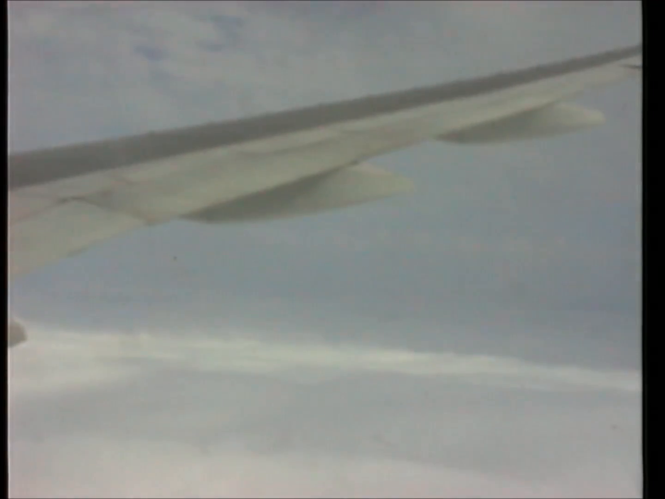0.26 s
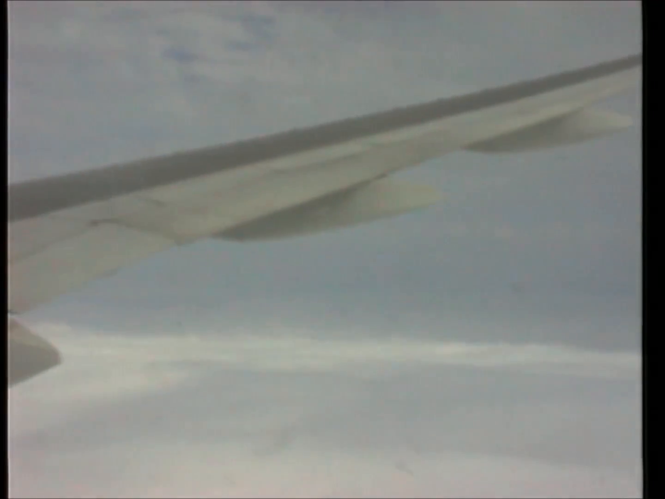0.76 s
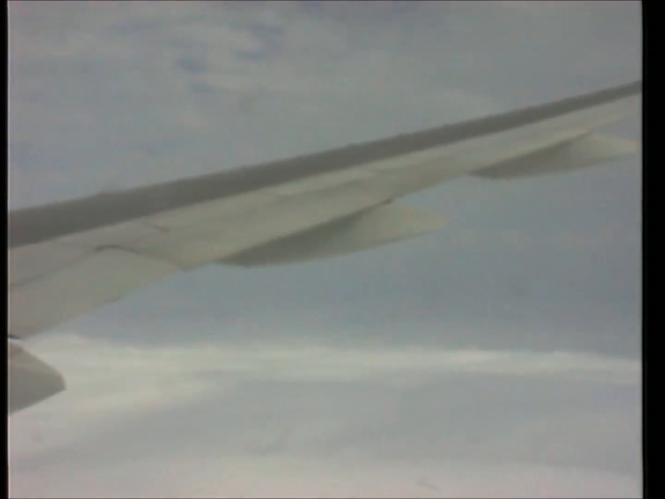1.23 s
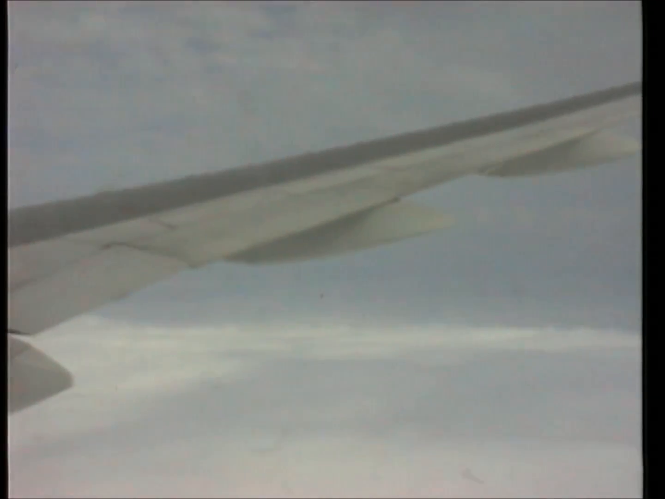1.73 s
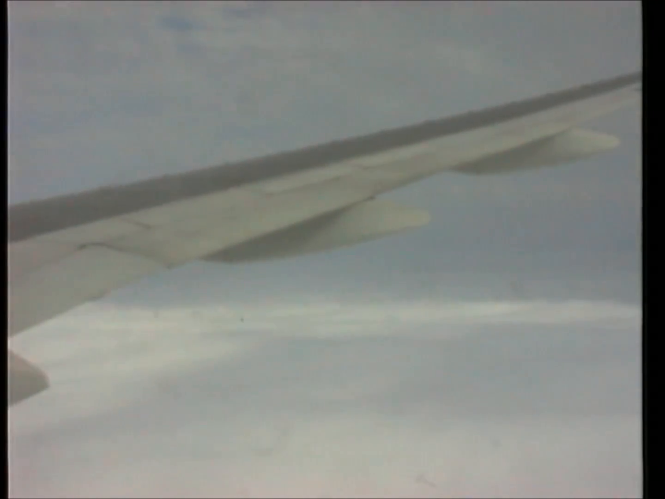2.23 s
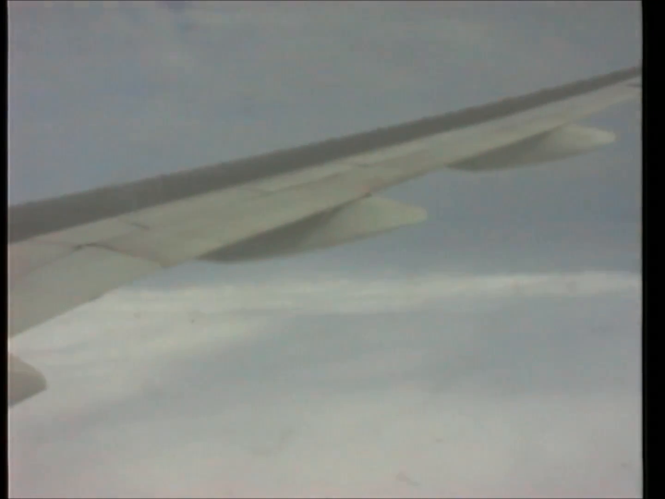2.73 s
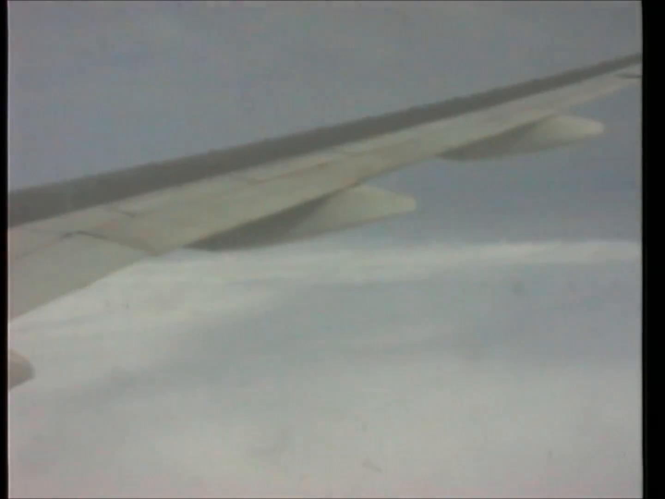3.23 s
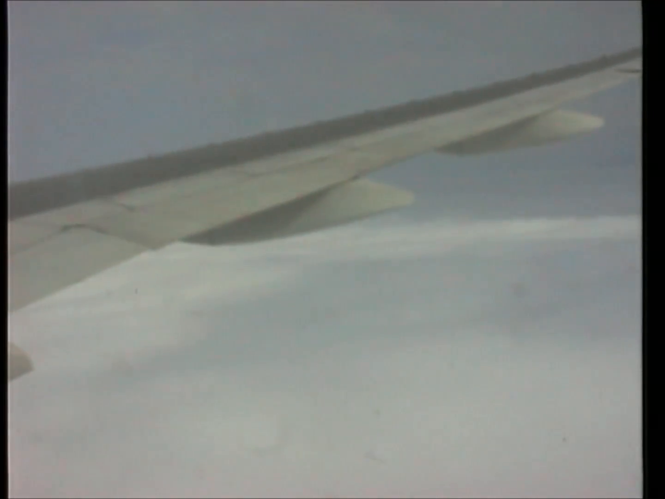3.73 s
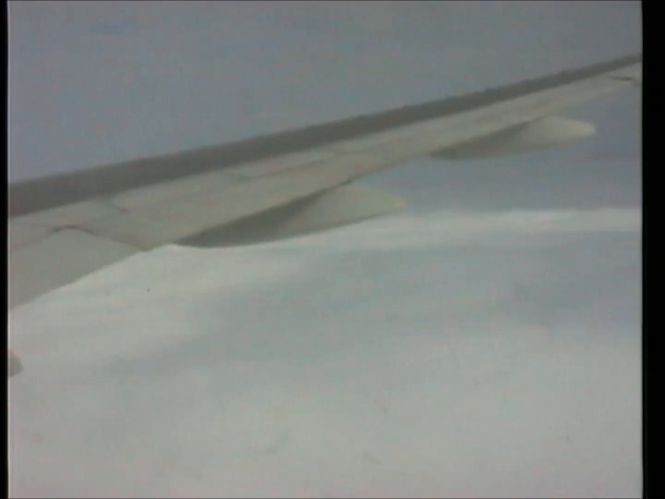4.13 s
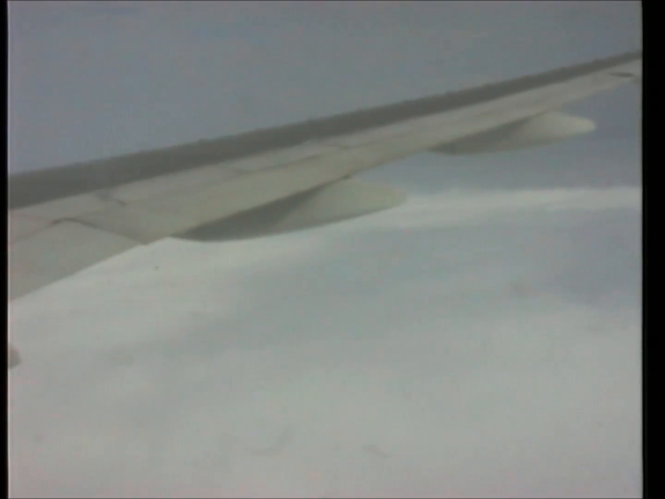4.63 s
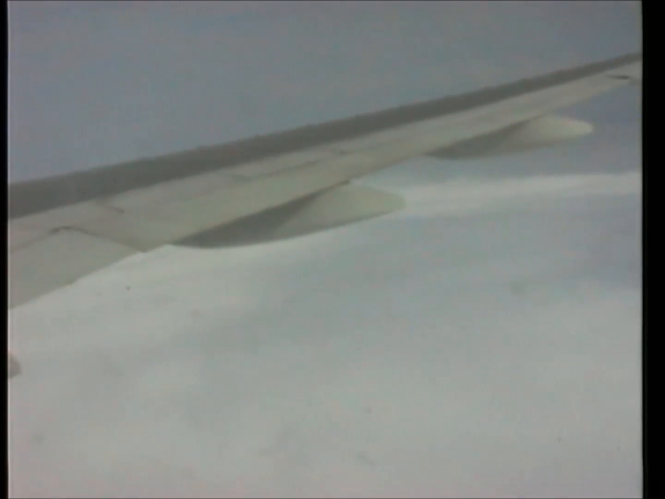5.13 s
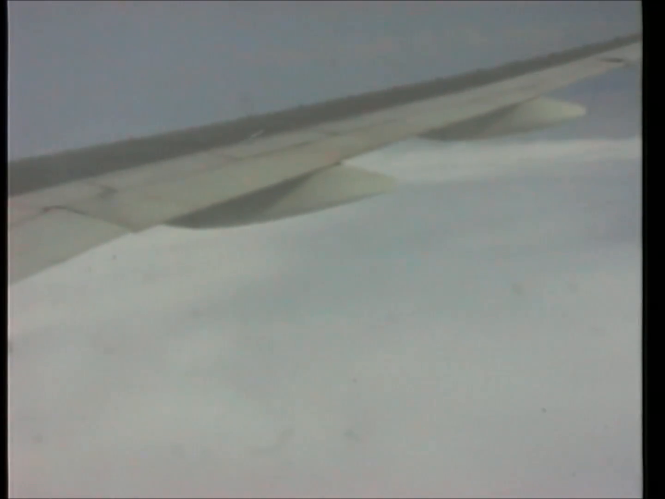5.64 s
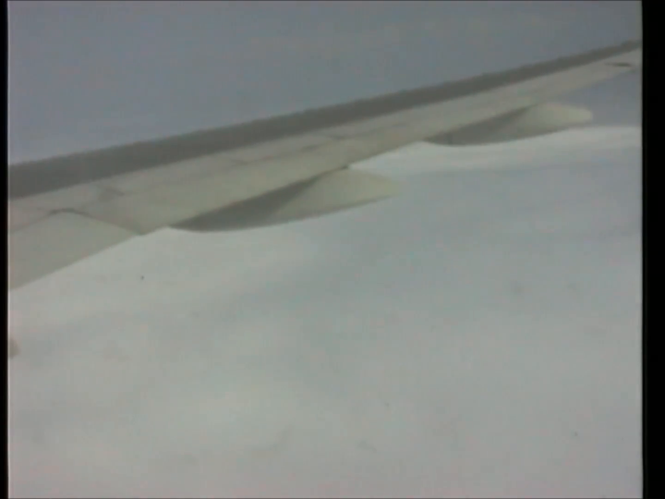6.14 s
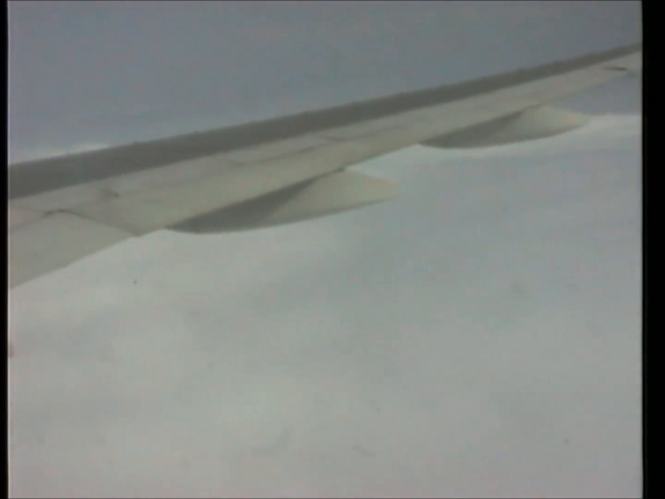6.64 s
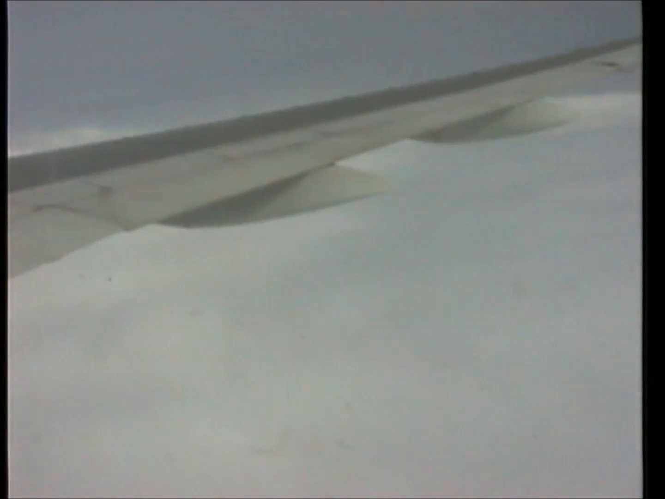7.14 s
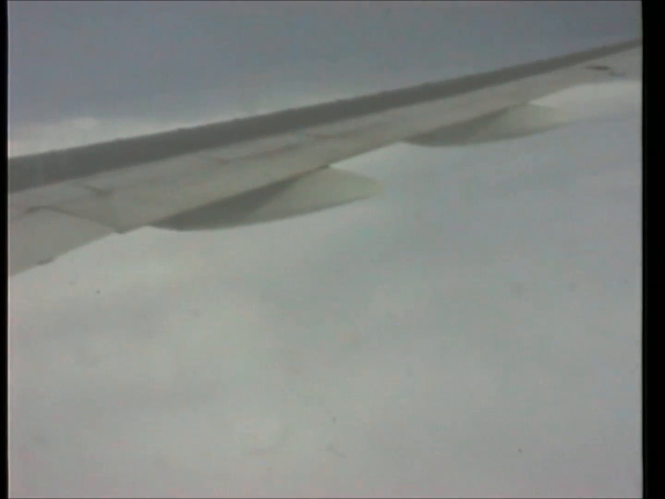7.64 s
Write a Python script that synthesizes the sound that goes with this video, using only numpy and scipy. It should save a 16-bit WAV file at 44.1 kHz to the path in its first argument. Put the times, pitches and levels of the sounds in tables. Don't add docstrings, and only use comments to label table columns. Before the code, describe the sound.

At a window seat in flight, low engine and airflow rumble holds constant while a hand-held tape camera whines, knocks, rubs and ticks.

```python
import sys
import numpy as np
from scipy import signal
from scipy.fft import rfft, irfft, next_fast_len
from scipy.io import wavfile
from scipy.ndimage import uniform_filter1d, map_coordinates

SR = 44100
rng = np.random.default_rng(int(sys.argv[2]) if len(sys.argv) > 2 else 0)


def undo_db(level):
    steps = np.asarray(level, float) / 20
    return 10 ** steps


def digitize_waveform(pressure):
    field = np.atleast_2d(pressure).T
    bounded = np.clip(field, -1, 1)
    quanta = np.round(bounded * 32767).astype(np.int16)
    wavfile.write(sys.argv[1], SR, quanta)


N = 347495


def unit(x):
    return x / np.sqrt(np.mean(x ** 2) + 1e-20)


def along(points, hz):
    f, v = np.transpose(points)
    return np.interp(np.log(hz + 1), np.log(f + 1), v)


def wobble(rate):
    steps = np.arange(0, N + 128, 128)
    knots = rng.standard_normal(int(N * rate / SR) + 4)
    return np.interp(np.arange(N), steps, map_coordinates(knots, [steps * rate / SR]))


def filtered(x, response):
    m = next_fast_len(N + SR // 2)
    return irfft(rfft(x, m) * response(np.fft.rfftfreq(m, 1 / SR)), m)[..., :N]


def resonance(f, hz, width):
    return 1j * f * width / (hz * hz - f * f + 1j * f * width)


def sides(db):
    return undo_db(np.array([db, -db]) / 2)


def levels(left_db, right_db):
    return undo_db([[left_db], [right_db]])


def place(track, start, sound):
    track[:, round(start * SR):][:, :sound.shape[1]] += sound


# frequency in Hz, phase lead in radians.
LEAD = [(60, .9), (130, .9), (200, .45), (255, -.3), (320, .2), (470, .6), (700, .2), (780, 2.5), (950, .2),
        (1600, .6), (2050, 2.6), (2900, .2), (4500, .3), (6000, 2.3)]


def right_lag(hz):
    return along(LEAD, hz)


# time in seconds, pitch in Hz.
FAN_PITCH = [
    (0, 1384),
    (1.5, 1387),
    (3, 1395),
    (4.5, 1405),
    (6, 1399),
    (7.88, 1402),
]


def fan():
    hz = np.interp(np.arange(N) / SR, *np.transpose(FAN_PITCH))
    turn = 2 * np.pi * np.cumsum(hz) / SR - [[0], [right_lag(FAN_PITCH[0][1])]]
    a, b = wobble(20), wobble(20)
    return undo_db(-54.5) * sides(-1.0)[:, None] * ((.5 + a) * np.sin(turn) + b * np.cos(turn))


def tone(hz, drift, unsteady_db, lead=None):
    turn = 2 * np.pi * (hz * np.arange(N) / SR + rng.uniform()) + drift
    late = right_lag(hz) if lead is None else lead
    return np.sqrt(2) * undo_db(unsteady_db * wobble(2.7)) * np.sin(turn - [[0], [late]])


# frequency in Hz, left level in dB, right level in dB.
HUMS = [(721.4, -57, -56), (1666, -73, -71), (1948, -71, -76), (2127.7, -70, -66.5), (15674.8, -101, -101),
        (15734.7, -95, -90), (15746.8, -97, -92)]
# frequency in Hz, left level in dB, right level in dB.
FAINT = [(3273, -72, -74), (3777, -70, -76), (3872, -68, -80), (3824.8, -71, -80), (4328.5, -72, -70),
         (4942, -80, -80), (6705, -84, -82), (7397, -93, -83), (7964, -83, -86), (8153, -88, -81),
         (8263, -95, -82), (8466, -94, -82), (9160, -96, -87), (9475, -95, -87), (9978, -101, -88),
         (10670, -92, -90), (15285, -104, -107)]


def hums(flutter):
    lines = HUMS + FAINT
    return undo_db(0.3) * sum(levels(l, r) * tone(hz, flutter, unsteady_db=1.5, lead=.7) for hz, l, r in lines)


GEAR_HZ, DRUM_HZ = 503.66, 149.85
# order, left level in dB, right level in dB.
DRUM = [(42, -85, -80), (46, -81, -84), (50, -86, -83), (52, -85, -76), (53, -70, -78), (54, -80, -74),
        (55, -83, -69), (56, -76, -76), (57, -84, -89), (58, -99, -87), (61, -92, -89), (62, -89, -99),
        (67, -92, -91), (68, -89, -93), (70, -90, -89), (72, -93, -94), (84, -91, -89), (90, -102, -99),
        (92, -99, -102), (96, -92.5, -96), (98, -94, -98), (100, -97, -100)]


def head_drum():
    drift = .004 * wobble(3)
    lines = (levels(l, r) * tone(k * DRUM_HZ, k * drift, unsteady_db=-0.5, lead=.3) for k, l, r in DRUM)
    return undo_db(-1.5) * sum(lines)


SLOW = 94.5
NEAR, FAST = DRUM_HZ - SLOW, 2 * DRUM_HZ - SLOW
# mesh rate in Hz,
# tooth start in cycles, angle on the slow shaft in turns, level in dB at the 8th order, slope in dB per order.
WHEELS = [(503.5186, .2172, .15, -.1, -.63), (503.5875, .482, .45, -9, -2),
          (503.6168, .726, .32, 1.3, -.39), (503.6876, 0, 0, 0, 0), (503.772, .033, -.37, -9.5, -2),
          (504.0107, .7535, -.18, -5.2, 0)]
PROFILE = {6: [-1.5, -2.5, 1, 0, -2.5, -5], 7: [1.5, -2, 1.5, 0, -5, -5.5], 8: [0, -11.5, 1.5, 0, -11, -4],
           9: [-6, -7, 0, 0, -8, -6.5], 13: [-5.5, -6, -1, 0, -11, -4.5]}
SKEW = {5: [0, .2, 0, -.07, .05, .1], 6: [-.07, 0, 0, -.02, -.07, -.04], 7: [-.03, -.03, 0, -.08, -.03,
        .01], 8: [.02, -.02, 0, .03, 0, 0], 9: [-.2, .18, 0, -.12, -.06, -.03], 13: [0, 0, 0, -.11, .09,
        -.03]}


def beat(order, shaft):
    t = np.arange(0, N + 128, 128) / SR
    side = np.sign(shaft) * (1 if abs(shaft) == SLOW else -1)
    sloped = [db + slope_db * (order - 8) for *_, db, slope_db in WHEELS]
    wheel_db = PROFILE.get(order, sloped)
    leans = SKEW.get(order, np.zeros(len(WHEELS)))
    z = 0
    for (hz, start, angle, *_), db, lean in zip(WHEELS, wheel_db, leans):
        turns = order * ((hz - GEAR_HZ) * t + start) + side * angle
        z = z + undo_db(db) * np.exp(2j * np.pi * (turns + lean))
    swell, phase = unit(np.abs(z)), np.unwrap(np.angle(z))
    return [np.interp(np.arange(N) / SR, t, v) for v in (swell, phase)]


def teeth(order, shaft, flutter, lead=None):
    swell, slip = beat(order, shaft)
    return swell * tone(order * GEAR_HZ + shaft, order * flutter + slip, unsteady_db=.3, lead=lead)


# order, left level in dB, right level in dB, left's lead in radians.
GEAR = [(6, -61.5, -70, -.4), (7, -71.5, -58.5, 1), (8, -55.5, -61, -.4), (9, -69, -71.5, .8),
        (10, -88, -83, .7), (12, -82, -80, -2.4), (13, -73.5, -68, 2.2), (14, -89, -95, -1.5)]
# order, shaft offset in Hz, left level in dB, right level in dB.
BANDS = [(5, SLOW, -66, -67), (6, SLOW, -68, -71), (7, SLOW, -68, -74), (8, SLOW, -70, -69),
         (9, SLOW, -76, -84), (12, SLOW, -75, -87), (13, SLOW, -75, -75), (14, SLOW, -78, -81),
         (15, SLOW, -81, -86), (17, SLOW, -90, -86), (5, -SLOW, -69, -72), (6, -SLOW, -75, -78),
         (7, -SLOW, -69, -72), (8, -SLOW, -78, -70), (9, -SLOW, -69, -68), (11, -SLOW, -83, -78),
         (12, -SLOW, -79, -78), (13, -SLOW, -88, -77), (14, -SLOW, -78, -85), (15, -SLOW, -91, -76),
         (5, FAST, -73, -75), (7, FAST, -72, -82), (8, FAST, -70, -72), (9, FAST, -78, -70),
         (7, -FAST, -68, -75), (8, -NEAR, -71, -77), (8, NEAR, -72, -73), (13, -NEAR, -84, -79),
         (13, NEAR, -83, -78)]


def gear_train(flutter):
    mesh = sum(levels(l, r) * teeth(k, 0, flutter, lead) for k, l, r, lead in GEAR)
    sidebands = sum(levels(l, r) * teeth(k, shaft, flutter) for k, shaft, l, r in BANDS)
    return undo_db(0.26) * mesh + undo_db(1.0) * sidebands


def whine():
    flutter = .012 * wobble(4)
    return gear_train(flutter) + head_drum() + hums(flutter)


# start in seconds, peak in dB, left minus right in dB, brightness in dB.
TICKS = [(1.316, -32.5, -4, -17), (1.3702, -32, -5, -21), (1.8226, -31, -2, -7), (2.4778, -37, -7, -6),
         (2.549, -51, -1, -1), (2.934, -40.5, -2, -4), (2.977, -36, -8, -15), (2.989, -31, 1, -17),
         (3.7466, -36, 0, -2), (4.269, -42, 3, -9), (4.407, -45, 1, -2), (4.923, -43, -4, -15),
         (5.3294, -46, -2, -5), (5.375, -44, -6, -15), (5.6605, -50, -6, -9), (6.232, -42, -2, -1),
         (6.559, -37, 2, -8), (7.0297, -54, 4, -1), (7.333, -52, -2, -2), (7.345, -38.5, -4, 12.5),
         (7.456, -50, -3, -3), (7.467, -44, -6, -8)]
# start in seconds, level in dB, length in seconds.
RUSTLES = [
    (0.045, -53.5, 0.04),
    (0.309, -56, 0.05),
    (0.505, -54, .045),
    (1.275, -57.5, 0.047),
    (2.52, -61, 0.048),
    (3, -54, .03),
    (3.04, -52.5, 0.021),
    (6.23, -58, 0.056),
    (7.336, -50, 0.051),
]
# frequency in Hz, level in dB.
TICK_COLOUR = [(1800, -19), (3200, 10.5), (4200, 13), (5500, 4), (9000, -2.5), (13000, -13.5), (15700, -24),
               (16000, -120)]


def ticks():
    out, t = np.zeros((2, N + SR)), np.arange(SR // 8) / SR
    for s, db, pan_db, bright_db in TICKS:
        fall = undo_db(-60 * t / 0.022) + undo_db(-15.5 - 60 * t / 0.08)
        noise = rng.standard_normal((2, len(t) + 2))
        bright = noise[:, 1:-1] - undo_db(bright_db) * np.diff(noise, 2)
        crackle = bright * fall * (1 - np.exp(-t / 0.00031))
        place(out, s, undo_db(db - 6.0) * sides(pan_db)[:, None] * crackle)
    for s, db, length in RUSTLES:
        grain_db = 5.3 * np.repeat(rng.standard_normal(len(t) // 64 + 1), 64)[:len(t)]
        grains = rng.standard_normal((2, len(t))) * undo_db(grain_db)
        place(out, s, undo_db(db) * grains * np.sin(np.pi * np.minimum(t / length, 1)))
    return filtered(out[:, :N], lambda f: undo_db(along(TICK_COLOUR, f)))


# start in seconds, peak,
# brightness, flap mode and lid mode in dB.
KNOCKS = [(0.345, -23.5, -1.5, 3.5, -0.5), (0.469, -26, 1.5, 3, 0.5), (0.526, -19.5, -6, -3.5, -0.5),
          (0.716, -24, -1.5, 0, 3), (0.753, -32, -1, -4, 7.5), (0.885, -19.5, -2.5, -3, 3.5),
          (0.934, -26, -10, -1.5, -11), (1.047, -29.5, 9, -1.5, 10.5), (1.371, -23, 3, 1, 7),
          (1.492, -28, 6, -9, 7), (2.48, -17.5, 5, -1.5, 6), (2.501, -24, 1, -6, 7.5),
          (2.738, -25.5, -4, -3.5, -2), (3.169, -24.5, -13, 1, 0), (3.454, -25, 3.5, -3, 5),
          (3.491, -24.5, 1.5, 0.5, 1.5), (3.852, -19, -2, -1, 0), (3.877, -20.5, -4, -6, -4),
          (4.097, -25.5, 0, 1.5, 3), (4.48, -21, -0.5, 0.5, 1.5), (4.806, -24, -7, -4, 2),
          (4.924, -21, 5.5, 1, 7), (5.374, -24, 3.5, -3.5, 4), (5.733, -36, -7, 2, 2),
          (6.109, -26, -7, 1.5, -3), (6.174, -26.5, 3, 1, -2), (6.259, -24, 4, -0.5, 4),
          (6.285, -25.5, 3.5, -6, 5.5), (6.562, -26, 0, -1, 0.5), (7.238, -24.5, -9, -2, -4.5),
          (0.799, -35, -6, 2, 2), (2.021, -31, 1, -5, -1), (4.732, -27, -4, -5, -0.5),
          (7.117, -35.5, 0, 0, -2),
          (.870, -25, 4.5, 0, 1), (.991, -31, 2, -1, -4), (1.107, -25, 4, -3, 0), (1.120, -26, 3.5, 1, 3),
           (1.134, -28, -3, -1, -1), (1.305, -26, -1, 0.5, -1), (2.751, -28.5, -6, -0.5, 4),
           (2.768, -25.5, -3, 2, 1), (2.782, -30, 4.5, -1.5, 0.5), (3.150, -27, -8, -1, 5),
           (3.317, -25.5, 2, -2, 1.5), (3.341, -22.5, -5, -1.5, -3), (3.357, -23.5, 0.5, -2, -2),
           (3.393, -27, 1, 1, 6), (3.724, -31.5, 6, -8.5, 1), (4.893, -26, -3, 2, 1),
           (4.905, -24, 1, -2, 4), (6.267, -27.5, 4, -2, 0.5), (6.360, -27, -1, 0, -2.5),
           (6.601, -27, -6, 1, 1)]
# frequency in Hz, width in Hz, level in dB.
BODY = [(470, 90, -6), (615, 42, 7), (825, 42, 2), (1180, 140, -7)]


def knock_force():
    force, t = np.zeros((len(BODY) + 1, N + SR)), np.arange(SR // 8) / SR
    rattle_s = 0.0035
    rattle_size = np.array(len(BODY) * [[0.045]] + [[0.11]])
    for s, db, bright_db, flap_db, lid_db in KNOCKS:
        rattle = rng.standard_normal(len(t)) * t / rattle_s * np.exp(1 - t / rattle_s)
        blow = rattle_size * rattle - (t == 0)
        place(force, s, undo_db(db + 32.0 + np.c_[[0, 0, flap_db, lid_db, bright_db - 4.5]]) * blow)
    return force


# start in seconds, level in dB, brightness in dB, length in seconds, flap mode in dB.
RUBS = [
    (.335, -29, -4, 0.027, 7),
    (0.511, -29, 0, 0.04, -1),
    (1.102, -27, -3, 0.042, 5),
    (2.742, -28.5, -3, 0.055, 4.5),
    (4.068, -35.5, -9, 0.05, -2),
    (6.266, -28, 0, 0.051, -6),
    (6.345, -27, -13, 0.04, 3),
]


def rub_force():
    force, t = np.zeros((len(BODY) + 1, N + SR)), np.arange(SR // 8) / SR
    for s, db, bright_db, length, flap_db in RUBS:
        swell = np.sin(np.pi * np.minimum(t / length, 1))
        slips = np.prod(rng.standard_normal((2, len(t))), 0) * swell
        locked = [swell * np.sin(2 * np.pi * hz * t) / swell.sum() for hz, *_ in BODY] + [0 * t]
        loose = slips / np.linalg.norm(slips) * np.c_[[.6, .6, .6, .8, 1]]
        drive = loose + 1.7 * np.array(locked)
        place(force, s, undo_db(db + 41.0 + np.c_[[0, 0, flap_db, 0, bright_db - 1.5]]) * drive)
    return force


# frequency in Hz, width in Hz, level in dB.
CASE = [(1620, 1250, -21), (2600, 130, -13.5), (3500, 380, -23.5), (5230, 3700, -31), (8000, 2400, -48.5)]
# frequency in Hz, left minus right in dB.
CASE_TILT = [(500, -17.5), (850, -11), (1200, -10.5), (2600, -10.5), (3500, -18.5), (8000, -4.5)]


def case_modes(rows, first=0):
    def response(f):
        fingertips = (1 + 1j * f / 7000) ** 2
        ring = sum((-1) ** (first + k) * undo_db(db) * resonance(f, hz, width)
                   for k, (hz, width, db) in enumerate(rows))
        return sides(along(CASE_TILT, f)) / fingertips * ring
    return response


def handling():
    force = (knock_force() + rub_force())[:, :N]
    low = sum(filtered(force[k], case_modes([mode], k)) for k, mode in enumerate(BODY))
    return low + filtered(force[-1], case_modes(CASE))


# frequency in Hz, likeness from 0 to 1.
ALIKE = [(40, .3), (80, .86), (180, .98), (250, .75), (340, .96), (500, .58), (620, .8), (750, .4),
         (850, .65), (1400, .9), (2050, .35), (2600, .45), (4000, .5), (5200, .15)]
# frequency in Hz, left minus right in dB.
TILT = [(40, -5), (100, -10), (170, -9), (238, -6), (325, -10.5), (430, -5), (560, -7.5), (620, 0.5),
        (700, -4), (840, -11), (920, -1), (1005, -3.5), (1300, -7), (2050, -1), (4800, -1.5)]


def rush(colour, patchy_db):
    z = signal.stft(rng.standard_normal((2, N)), nperseg=512)[2]
    patches = rng.standard_normal(z.shape[1:])
    field = uniform_filter1d(uniform_filter1d(patches, 6, 0), 14, 1)
    shared, own = signal.istft(z * undo_db(patchy_db * unit(field)), nperseg=512)[1][:, :N]

    def alike(hz):
        return np.clip(along(ALIKE, hz), 0, 1)

    right = filtered(shared, lambda hz: alike(hz) * np.exp(-1j * right_lag(hz)))
    right = right + filtered(own, lambda hz: np.sqrt(1 - alike(hz) ** 2))
    pair = filtered(np.array([shared, right]), lambda hz: colour(hz) * sides(along(TILT, hz)))
    return pair / np.sqrt(np.mean(pair.mean(0) ** 2))


# frequency in Hz, level in dB per Hz.
AIR = [(880, -27), (1500, -1.5), (1560, -4), (1740, 1.5), (2240, -1.5), (2600, -2), (3770, -10),
       (4120, -6.5), (5370, -14.5), (7560, -16), (8100, -20.5), (9110, -24.5), (12500, -28), (15700, -44)]
# frequency in Hz, width in Hz, lift in dB.
DUCTS = [(1660, 34, 3), (2030, 130, 2.5), (15620, 120, 5)]


def vent_hiss():
    def colour(f):
        singing_db = sum(db * np.abs(resonance(f, hz, width)) ** 2 for hz, width, db in DUCTS)
        return undo_db(along(AIR, f) + singing_db)
    return undo_db(-49.5 + 0.13 * wobble(8.7)) * rush(colour, patchy_db=1.1)


# frequency in Hz, level in dB per Hz.
WALL = [(20, -46), (48, -39.5), (70, -35.5), (100, -20.5), (125, -7.5), (340, -8.5), (420, -17), (700, -27),
        (1400, -35), (1600, -48), (2500, -51), (4000, -120)]
# frequency in Hz, width in Hz, level in dB over the wall.
CABIN = [(171, 32, 4.5), (241.3, 40, 6.5), (327, 39.5, 8), (203, 16, -2.5), (599, 97, 4), (737, 22, -2.5),
         (895, 72, -4.5), (1006, 55, 5), (1223, 100, -5.5), (1389, 100, 6)]


def roar():
    def colour(f):
        lift = sum((undo_db(2 * db) - 1) * np.abs(resonance(f, hz, width)) ** 4 for hz, width, db in CABIN)
        return undo_db(along(WALL, f)) * np.sqrt(1 + lift)
    return undo_db(-21.5 + .4 * wobble(6)) * rush(colour, patchy_db=.5)


def scene():
    return fan() + whine() + ticks() + handling() + vent_hiss() + roar()


def top_cut(x):
    return signal.sosfilt(signal.butter(12, 15810, fs=SR, output="sos"), x)


OFFSET = [
    [.0011],
    [.0053],
]


def record(dry):
    soft = dry / (1 + np.abs(dry / .78) ** 3) ** (1 / 3)
    return top_cut(soft + OFFSET)


dry = scene()
out = record(dry)
digitize_waveform(out)
```